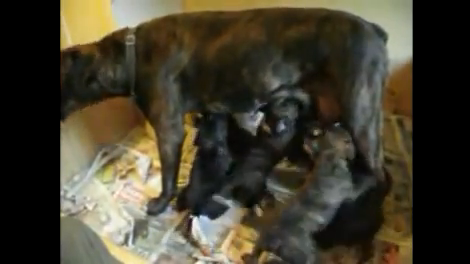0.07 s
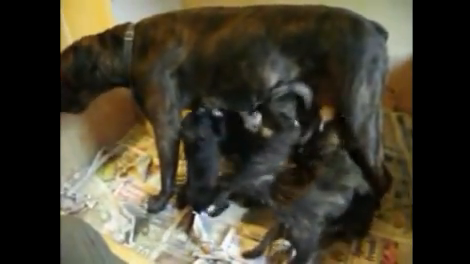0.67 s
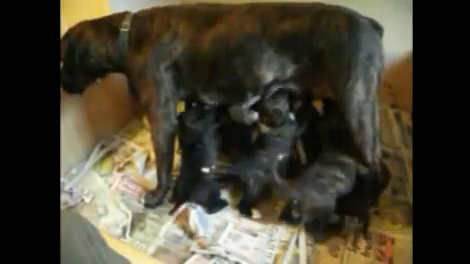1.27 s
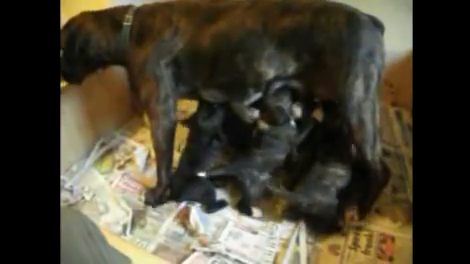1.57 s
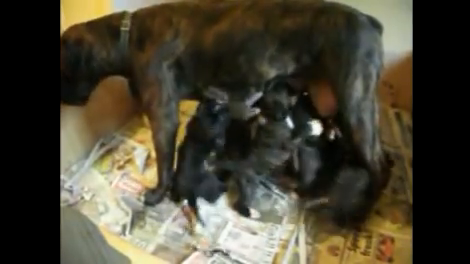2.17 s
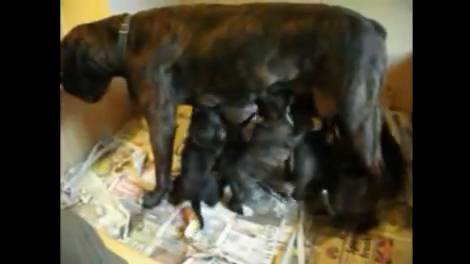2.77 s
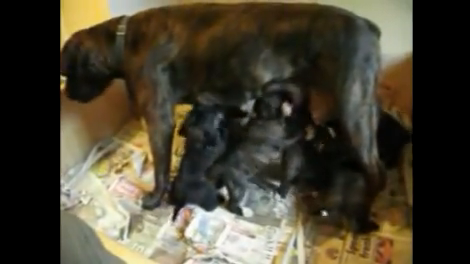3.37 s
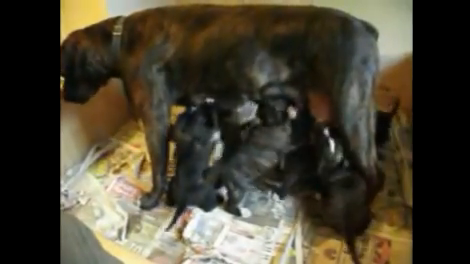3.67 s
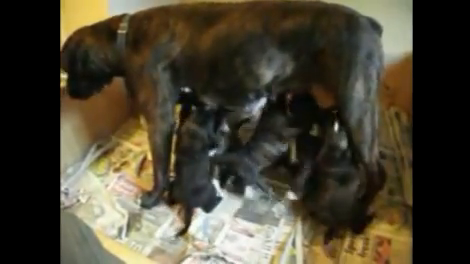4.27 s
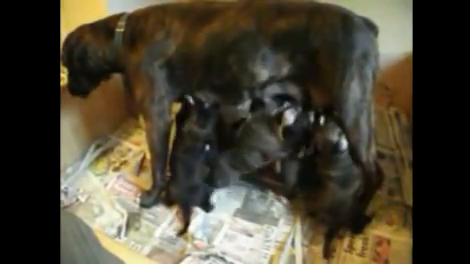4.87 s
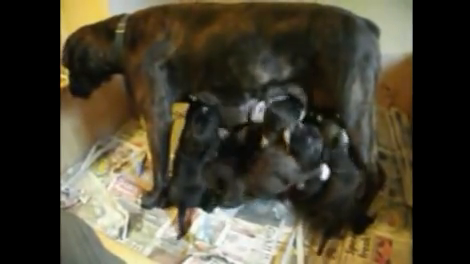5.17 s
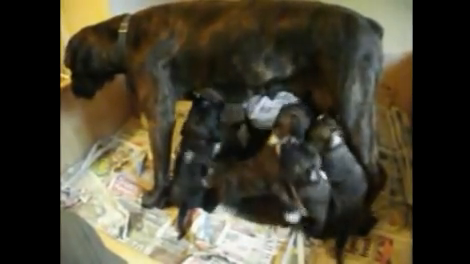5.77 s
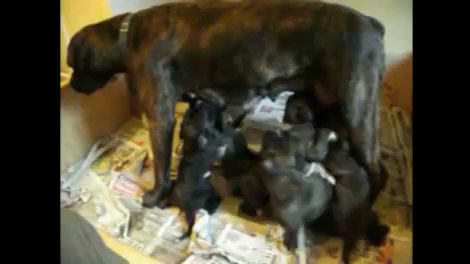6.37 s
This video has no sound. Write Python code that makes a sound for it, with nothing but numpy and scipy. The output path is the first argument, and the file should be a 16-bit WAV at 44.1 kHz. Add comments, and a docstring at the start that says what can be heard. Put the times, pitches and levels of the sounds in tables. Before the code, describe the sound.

Newspaper rustles and crinkles under scrambling puppies, with dull little thuds and occasional mouth smacks in a small room.

```python
"""Puppies in a paper-lined box

Puppies jostle and suckle under their standing mother in a small room. Their paws drag over newspaper,
which crackles by stick-slip friction and snaps as its creases buckle. Landing bodies excite the modes
of the box floor, and mouths smack as suction breaks. Behind them a hand-held camera rumbles and is
jolted twice; its small microphone hisses and rounds off the sharpest peaks."""
import sys
import numpy as np
from scipy import signal
from scipy.fft import rfft, irfft, next_fast_len
from scipy.io import wavfile
from scipy.ndimage import uniform_filter1d

SR = 44100
rng = np.random.default_rng(int(sys.argv[2]) if len(sys.argv) > 2 else 0)


def pcm_store(signal):
    """Save signal as 16-bit PCM."""
    levels = np.round(np.clip(np.atleast_2d(signal), -1, 1) * 32767)
    wavfile.write(sys.argv[1], SR, levels.astype(np.int16).T)


N = 287973
TIME = np.arange(N) / SR


def from_db(db):
    """Amplitude ratio of a level in decibels."""
    return 10 ** (np.asarray(db) / 20)


def rms(x):
    """Root-mean-square amplitude."""
    return np.sqrt(np.mean(x ** 2) + 1e-20)


def gain_curve(rows):
    """Amplitude envelope, interpolated linearly in decibels."""
    return from_db(np.interp(TIME, *np.transpose(rows)))


def add(out, start_s, sound):
    """Superposition: a sound adds to the mix from its start time."""
    at = max(0, round(start_s * SR))
    out[at:at + len(sound)] += sound[:N - at]


def colour(x, spectrum):
    """Minimum-phase filtering to a given spectral shape; the result has rms 1."""
    size = next_fast_len(len(x) + SR // 10, True) * 2
    hz, db = np.transpose(spectrum)
    bins_hz = np.maximum(np.arange(size // 2 + 1) * SR / size, 1)
    magnitude = from_db(np.interp(np.log(bins_hz), np.log(hz), db))
    cepstrum = irfft(np.log(magnitude))
    cepstrum[1:size // 2] *= 2   # folding onto positive time makes the filter causal
    cepstrum[size // 2 + 1:] = 0
    out = irfft(rfft(x, size) * np.exp(rfft(cepstrum)))[:len(x)]
    return out / rms(out)


def ring(x, hz, t60_s):
    """Damped oscillator: a unit impulse starts a decaying sine of amplitude 1."""
    radius, angle = from_db(-60 / (t60_s * SR)), 2 * np.pi * hz / SR
    return signal.lfilter([0, np.sin(angle)], [1, -2 * radius * np.cos(angle), radius ** 2], x + 1e-18)


def resonance(x, hz, width_hz):
    """Second-order band-pass resonance with unity peak gain."""
    radius, angle = np.exp(-np.pi * width_hz / SR), 2 * np.pi * hz / SR
    numerator = np.array([1, 0, -1]) * (1 - radius ** 2) / 2
    return signal.lfilter(numerator, [1, -2 * radius * np.cos(angle), radius ** 2], x)


def grains(per_s, spread_db, clump_db=4.0):
    """Shot noise: slipping fibres click at random, in brief clumps that modulate the base rate."""
    clumps = uniform_filter1d(rng.standard_normal(N), size=SR // 120)
    rate = per_s * from_db(clump_db * clumps / rms(clumps))
    sizes = from_db(spread_db * np.minimum(rng.exponential(1, N), 4))
    return sizes * rng.choice([-1, 1], N) * (rng.random(N) < rate / SR)


# spectrum of the microphone's noise: frequency_hz, gain_db
HISS_SPECTRUM = [(15, -6), (45, -5.5), (100, 2), (200, -4), (500, -10), (1000, -7.5), (1800, -13),
                 (2500, -3), (2900, 4), (3400, -11), (4100, -11.5), (5000, -20), (6500, -38.5)]

def microphone_hiss(level_db=-34.5):
    """Self-noise: a steady random signal with a resonant peak near 3 kHz."""
    return from_db(level_db) * colour(rng.standard_normal(N), HISS_SPECTRUM)


# spectrum of the camera body's vibration: frequency_hz, gain_db
RUMBLE_SPECTRUM = [(12, -14.5), (21, -0.5), (26, 14.5), (36, -19.5), (52, -6.5), (75, -24.5), (107, -20.5),
                   (160, -38.5), (500, -49.5), (4000, -100)]
# envelope of the hand's sway: time_s, level_db
HAND_SWAY = [(0, -33), (.5, -40), (.95, -27), (1.25, -39.5), (2.3, -35), (2.8, -43), (3.8, -41),
             (4.3, -26.5), (5.5, -28.5), (5.9, -38.5), (6.53, -41)]
# jolts to the camera: start_s, level_db, hold_s
CAMERA_JOLTS = [(0.647, -16, 0.029), (4.649, -6, 0.087)]

def camera_rumble(sway_db=-0.5, attack_s=0.02, release_s=0.055):
    """Structure-borne noise: the camera body vibrates as strongly as the hand sways and jolts it."""
    shake = from_db(sway_db) * gain_curve(HAND_SWAY)
    for start_s, level_db, hold_s in CAMERA_JOLTS:
        before, after = np.maximum(start_s - TIME, 0), np.maximum(TIME - start_s - hold_s, 0)
        shake += from_db(level_db) * np.exp(-before / attack_s - after / release_s)
    wobble = colour(rng.standard_normal(N), RUMBLE_SPECTRUM)
    wobble /= np.sqrt(uniform_filter1d(wobble ** 2, size=SR // 10) + 1e-9)   # evens out its level
    return shake * wobble


# spectra of fine rustle and of all crackling paper fibres: frequency_hz, gain_db
RUSTLE_SPECTRUM = [(80, -6), (250, 1.5), (600, -5), (1100, -8.5), (1800, -1), (2500, 0.5), (3000, 4.5),
                   (3500, -5), (4100, -19), (5000, -20.5), (6500, -51.5)]
CRACKLE_SPECTRUM = [(150, -23.5), (700, -22), (1400, -16.5), (2000, -5), (2500, -1.5), (3100, 1),
                    (3550, -3.5), (4100, -11), (5000, -27.5), (6500, -44.5)]
# envelope of the whole litter's shuffling: time_s, level_db
LITTER_ACTIVITY = [(0.0, -31), (0.13, -36.5), (0.54, -35.5), (0.87, -28), (1.38, -31), (1.67, -31),
                   (1.91, -34.5), (2.67, -34.5), (3.09, -24.5), (3.29, -27.5), (3.54, -31), (4.11, -26),
                   (4.49, -32.5), (4.95, -32), (5.71, -38.5), (6.04, -27.5), (6.53, -38.5)]

def litter_rustle(rustle_db=-4.5, crinkle_db=-12.0, fidget_db=2.5):
    """Amplitude-modulated shot noise: paper rustles in fits under many paws, with single crinkles."""
    fits = uniform_filter1d(rng.standard_normal(N), size=SR // 25)
    fits = uniform_filter1d(fits, size=SR // 60)
    rustle = from_db(rustle_db) * colour(grains(per_s=1500, spread_db=3.0), RUSTLE_SPECTRUM)
    crinkles = from_db(crinkle_db) * colour(grains(per_s=60, spread_db=3.0), CRACKLE_SPECTRUM)
    return gain_curve(LITTER_ACTIVITY) * from_db(fidget_db * fits / rms(fits)) * (rustle + crinkles)


# spectrum of a whole sheet flapping: frequency_hz, gain_db
FLAP_SPECTRUM = [(60, -12.5), (250, -6), (600, 0.5), (1300, 1.5), (1900, 2.5), (2800, -9.5), (4500, -22),
                 (7000, -63)]
# paws and bodies landing on the floor: start_s, level_db, centre_hz
LANDINGS = [(0.001, -22.5, 161.5), (0.236, -24.5, 260), (0.849, -34, 295), (1.098, -31, 324),
            (1.533, -25, 235), (1.611, -27, 261), (1.763, -34, 156), (1.945, -34, 152), (2.121, -27, 210),
            (2.197, -19.5, 262), (2.31, -29.5, 207), (2.998, -32.5, 258), (3.107, -31.5, 274),
            (3.279, -14.5, 460), (3.411, -29, 191), (3.624, -27, 228), (3.871, -23, 312), (3.938, -28, 332),
            (3.998, -18, 245), (4.203, -31, 290), (4.415, -27, 308), (4.614, -30.5, 270), (4.698, -27, 208),
            (5.147, -29.5, 229), (5.386, -16.5, 202), (5.701, -31, 228), (6.053, -28, 444)]

def sheet_slaps(gain_db=-19, decay_s=0.028):
    """Impact noise: the sheet under each landing gives an exponentially decaying burst."""
    envelope, t = np.zeros(N), TIME[:SR // 5]
    for start_s, level_db, _ in LANDINGS:
        add(envelope, start_s, from_db(level_db + gain_db) * np.exp(-t / decay_s))
    return envelope * colour(rng.standard_normal(N), FLAP_SPECTRUM)


def body_slumps(delay_s=0.058, gain_db=-7.5, pitch_ratio=0.82, belly_hz=189, db_per_octave=8.5):
    """Secondary impacts, later and duller: a soft belly brings down more weight than a sharp paw."""
    return [(start_s + delay_s, db + gain_db - db_per_octave * np.log2(hz / belly_hz), pitch_ratio * hz)
            for start_s, db, hz in LANDINGS]


def light_steps(per_s=4, level_db=-41.5, centre_hz=260):
    """Weak impacts at random times: a harder contact has a higher centre frequency."""
    chances = rng.random((int(per_s * N / SR), 2))
    return [(when * TIME[-1], level_db, centre_hz * 2 ** (hardness - .5)) for when, hardness in chances]


# normal modes of the box floor: frequency_hz, gain_db, t60_s
FLOOR_MODES = [(134, -0.5, 0.19), (149.2, 0.5, 0.18), (172.3, 2, 0.072), (212, -3.5, 0.19), (235, -3, .22),
               (271, -4, .17), (334.4, -0.5, 0.03), (393, -1.5, .13), (449, 0.5, 0.085), (518, -4, .1),
               (610, -7.5, .058), (696, -5, 0.074)]

def floor_bumps(gain_db=1.0, reach_octaves=0.71, skid_s=0.014, scatter_db=4.0, boom_db=-13, boom_hz=107):
    """Modal response: a skidding impact rings the floor, and harder contacts reach higher modes."""
    out, t = np.zeros(N), TIME[:SR // 3]
    onset = slice(0, SR // 50)
    for start_s, level_db, centre_hz in LANDINGS + body_slumps() + light_steps():
        force = rng.standard_normal(len(t)) * np.exp(-t / skid_s)
        force[SR // 400] += 0.79 * np.linalg.norm(force)   # the weight arrives just after first touch
        floor = np.zeros(len(t))
        for hz, mode_db, t60_s in FLOOR_MODES:
            reach = np.exp(-.5 * (np.log2(hz / centre_hz) / reach_octaves) ** 2)
            strength = reach * from_db(mode_db + scatter_db * rng.standard_normal())
            mode = ring(force, hz, t60_s)
            floor += strength * mode / np.abs(mode).max()
        pad_band = signal.butter(4, [.5 * centre_hz, 1.465 * centre_hz], "band", fs=SR, output="sos")
        pad_thud = signal.sosfilt(pad_band, force)
        bump = floor / rms(floor[onset]) + 0.5 * pad_thud / rms(pad_thud[onset])
        # a soft, heavy landing also sets the whole box booming
        boom = ring(force, boom_hz, t60_s=0.65)
        boom *= from_db(boom_db) * (2 * boom_hz / centre_hz) ** 2 / np.abs(boom).max()
        add(out, start_s, from_db(level_db + gain_db) * (bump / rms(bump[onset]) + boom))
    return out


# mouths smacking at the teats: start_s, peak_db, pitch_hz
SUCKLING = [(0.073, -19.5, 1330), (1.254, -20.5, 1420), (1.402, -19, 1255), (2.397, -8.5, 1275),
            (2.402, -15.5, 735), (3.466, -25.5, 1080), (3.781, -18.5, 2130), (5.314, -24, 2340),
            (5.7783, -11, 2560)]

def mouth_smacks(relative_width=0.35, settle_s=0.004, wetness=0.25):
    """Cavity resonance: suction breaks with a wet tick that rings the small mouth."""
    out, t = np.zeros(N), TIME[:SR // 20]
    for start_s, peak_db, pitch_hz in SUCKLING:
        tick = wetness * rng.standard_normal(len(t)) * np.exp(-t / settle_s)
        tick[0] += 1
        width_hz = relative_width * pitch_hz
        cavity = resonance(resonance(tick, pitch_hz, width_hz), pitch_hz, 2 * width_hz)
        smack = colour(cavity, FLAP_SPECTRUM)
        add(out, start_s, from_db(peak_db) * smack / np.abs(smack).max())
    return out


# paws dragging over paper: middle_s, length_s, crackle_db, flap_db
PAW_DRAGS = [(0.174, .039, -29.5, -34.5), (0.293, 0.074, -35.5, -40.5), (0.715, 0.067, -31.5, -42),
             (0.845, 0.028, -33, -38.5), (0.981, 0.045, -26.5, -35.5), (1.236, 0.03, -33.5, -48),
             (1.52, 0.059, -32, -34), (1.736, 0.04, -32, -37.5), (1.925, 0.056, -33.5, -35.5),
             (2.144, 0.037, -26.5, -27.5), (2.297, .05, -28, -47), (2.404, 0.057, -26, -31.5),
             (2.566, .033, -24.5, -35.5), (2.677, 0.068, -33.5, -38.5), (2.786, 0.017, -28.5, -36),
             (2.886, 0.04, -11, -24), (3.165, 0.041, -28.5, -35.5), (3.239, 0.034, -24, -39),
             (3.29, 0.034, -31, -27), (3.638, 0.035, -29, -42), (3.709, 0.017, -27, -42),
             (3.982, 0.031, -29, -29), (4.142, 0.031, -29.5, -31.5), (4.959, 0.093, -29, -44),
             (5.178, 0.058, -40, -38.5), (5.417, 0.053, -29, -38.5), (5.648, 0.027, -31, -37),
             (6.07, 0.033, -26, -26.5), (6.13, 0.094, -33, -55)]

def paw_scuffs(crackle_gain_db=0.5, flap_gain_db=1.5, skirt_db=-19.5, skirt_stretch=2.8):
    """Stick-slip friction: each drag swells and fades as fibres crackle and the sheet flaps dully."""
    crackle, flap = np.zeros(N), np.zeros(N)
    for middle_s, length_s, crackle_db, flap_db in PAW_DRAGS:
        falloff = 2.0 * ((TIME - middle_s) / length_s) ** 2
        # the paper around the paw stirs more weakly and for longer
        skirt = from_db(skirt_db) * np.exp(-falloff / skirt_stretch ** 2)
        stroke = np.exp(-falloff) + skirt
        crackle += stroke * from_db(crackle_db + crackle_gain_db)
        flap += stroke * from_db(flap_db + flap_gain_db)
    slips = grains(per_s=1800, spread_db=0.0)
    buckles = grains(per_s=1700, spread_db=1.5)
    return crackle * colour(slips, CRACKLE_SPECTRUM) + flap * colour(buckles, FLAP_SPECTRUM)


# creases giving way: start_s, level_db, pitch_hz, flap_db, settle_s
CREASES = [(0.2279, -21.5, 2910, -1, 0.014), (0.696, -20.5, 3100, -12, .002),
           (0.9665, -22.5, 2890, -11, 0.0024), (1.1341, -19, 3140, -8, 0.0015),
           (1.5037, -13.5, 2410, -18, 0.014), (1.6107, -26.5, 2240, 2, 0.016),
           (1.993, -25, 3250, -17, 0.0038), (2.1438, -14.5, 3140, -11, 0.0028),
           (2.368, -20, 3020, -5.5, .002), (2.3915, -13, 3450, -11, .011), (2.538, -21.5, 3120, -15, 0.017),
           (2.6402, -17.5, 2640, -2, 0.0066), (2.8318, -17.5, 3400, -13, 0.0018),
           (2.8564, -15, 3300, -21, .008), (2.878, -11.5, 2770, -30, .011),
           (2.979, -20.5, 2620, -9, 0.0018), (3.0455, -22.5, 3100, -4, 0.0067),
           (3.182, -17.5, 2670, -11, 0.005), (3.5032, -22.5, 3400, -15, 0.015),
           (4.192, -21, 3120, -12, 0.0097), (4.239, -16, 2950, -9.5, 0.0019),
           (4.706, -18.5, 3230, -5.5, 0.0073), (4.8399, -26, 2500, -15, 0.0092),
           (5.001, -19, 3300, -6.5, 0.0017), (5.3813, -15.5, 2700, 2, 0.0037),
           (5.902, -24.5, 2680, -2, 0.0036), (6.0257, -27.5, 2960, -3, 0.0024),
           (6.0665, -9.5, 3030, -22, 0.01)]

def crease_snaps(width_hz=750, flap_gain_db=-4.0, aftershock=0.22):
    """Snap-through buckling: a crease gives way with one click and a quick run of smaller ones."""
    out, t = np.zeros(N), TIME[:SR // 12]
    onset = slice(0, SR // 166)
    for start_s, level_db, pitch_hz, flap_db, settle_s in CREASES:
        burst = aftershock * rng.standard_normal(len(t)) * np.exp(-t / settle_s)
        burst[SR // 2000] += 1   # the main click
        ringing = resonance(resonance(burst, pitch_hz, width_hz), pitch_hz, 2 * width_hz)
        crack = colour(ringing, CRACKLE_SPECTRUM)
        flap = colour(burst, FLAP_SPECTRUM)
        snap = crack / rms(crack[onset]) + from_db(flap_db + flap_gain_db) * flap / rms(flap[onset])
        add(out, start_s, from_db(level_db) * snap / rms(snap[onset]))
    return out


def room(x, early_db, tail_db, early_t60_s=0.052, tail_t60_s=0.19):
    """Reverberation: direct sound, early reflections from the box walls, then the room's short tail."""
    t = TIME[:SR // 2]
    early = rng.standard_normal(len(t)) * from_db(-60 * t / early_t60_s) * (t > .003)
    tail = rng.standard_normal(len(t)) * from_db(-60 * t / tail_t60_s) * (t > .011)
    early *= from_db(early_db) / np.linalg.norm(early)
    tail *= from_db(tail_db) / np.linalg.norm(tail)
    return x + signal.fftconvolve(x, early + tail)[:N]


def scene():
    """Superposition: paper, mouths and floor reverberate; rumble and hiss add directly."""
    paper = paw_scuffs() + crease_snaps() + sheet_slaps()
    litter = room(paper + mouth_smacks() + litter_rustle(), early_db=-8.0, tail_db=-12.0)
    floor = room(floor_bumps(), early_db=-8.5, tail_db=-3.5)
    background = microphone_hiss() + camera_rumble()
    return (background + floor + litter)[None]


def record(dry):
    """Band limiting and saturation: narrow band, rounded peaks; the converter rests just off zero."""
    bandwidth_hz, cutoff_hz, dc_offset = 6700, 15800, 0.02
    band_limit = signal.cheby1(10, .3, bandwidth_hz, fs=SR, output="sos")
    narrow = signal.sosfilt(band_limit, dry) + dc_offset
    rounded = narrow / (1 + narrow ** 8) ** (1 / 8)
    top_cut = signal.butter(16, cutoff_hz, fs=SR, output="sos")
    resting_state = dc_offset * signal.sosfilt_zi(top_cut)[:, None]
    return signal.sosfilt(top_cut, rounded, zi=resting_state)[0]


dry = scene()
out = record(dry)
pcm_store(out)
```